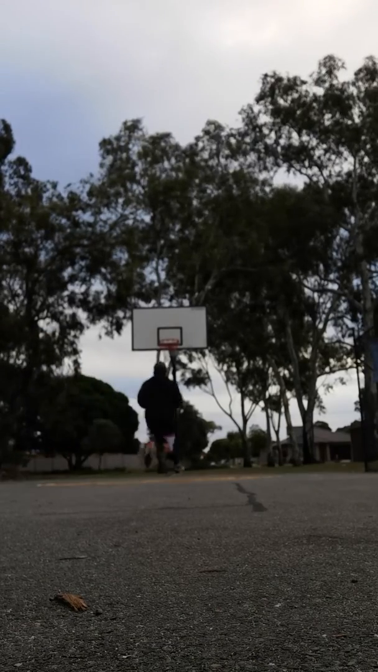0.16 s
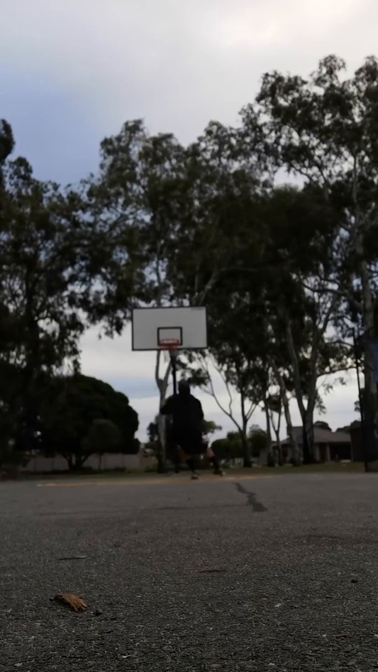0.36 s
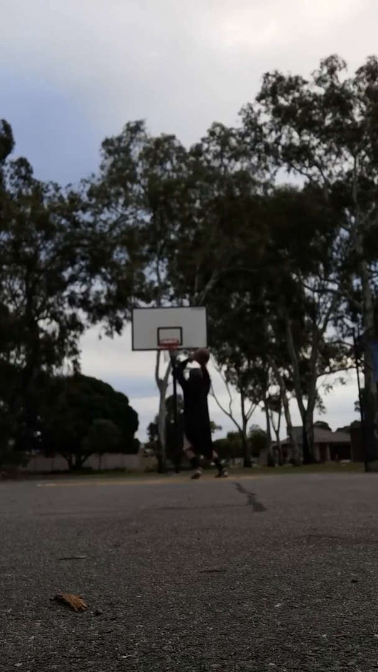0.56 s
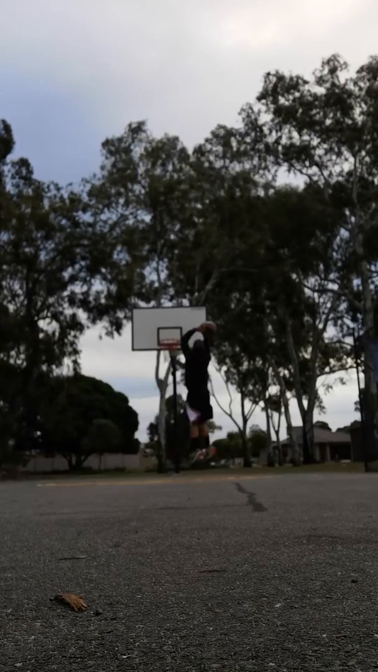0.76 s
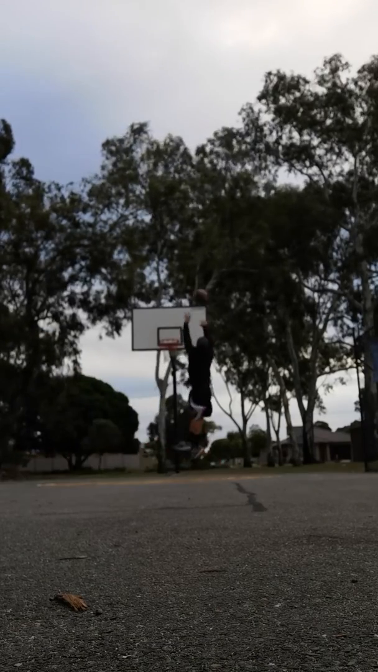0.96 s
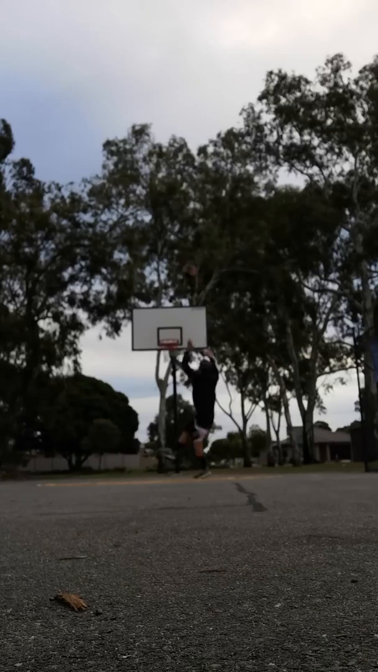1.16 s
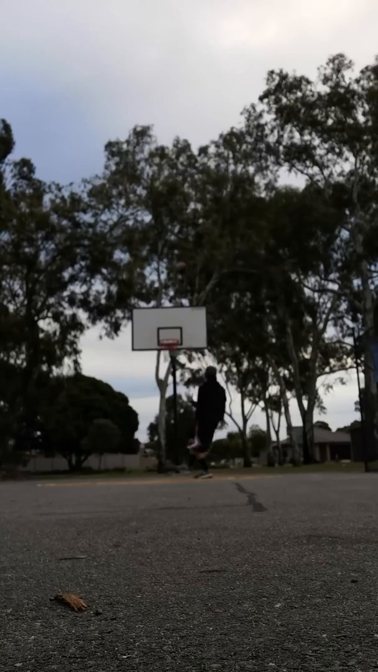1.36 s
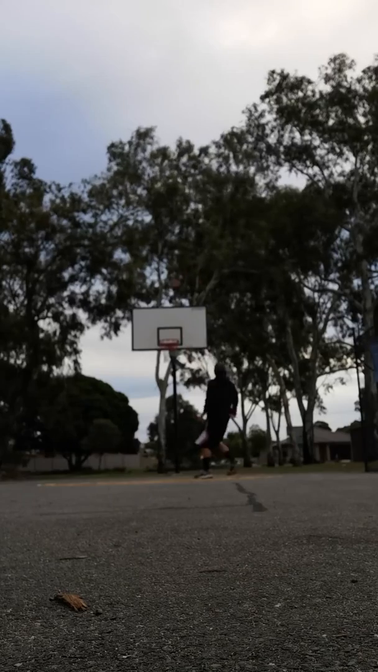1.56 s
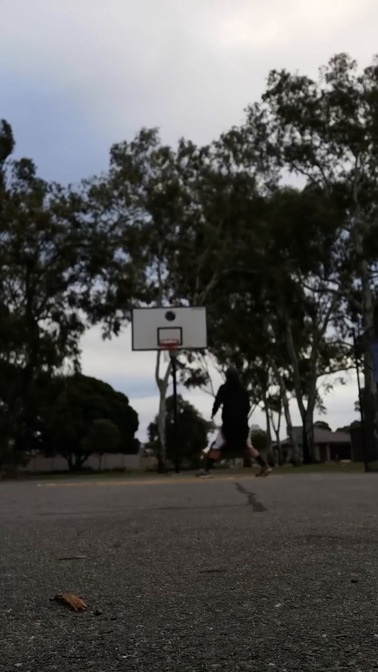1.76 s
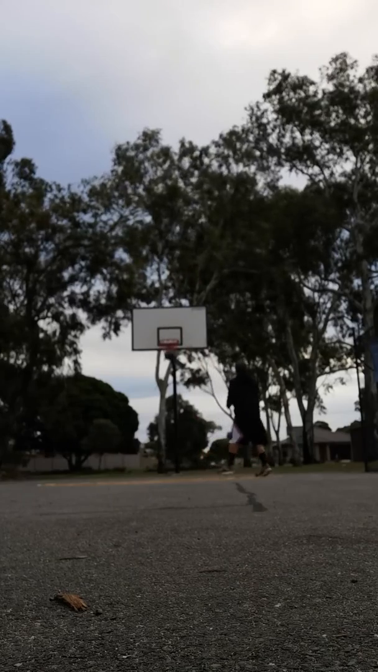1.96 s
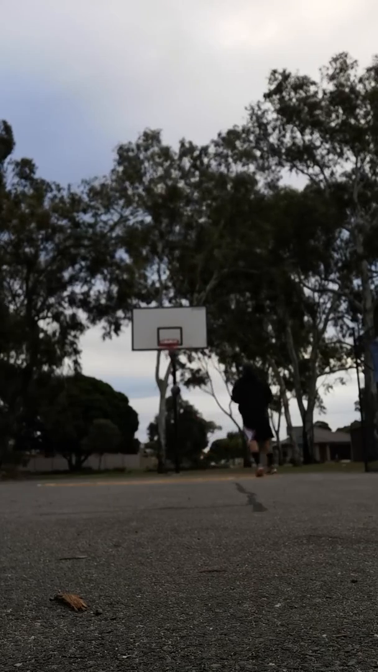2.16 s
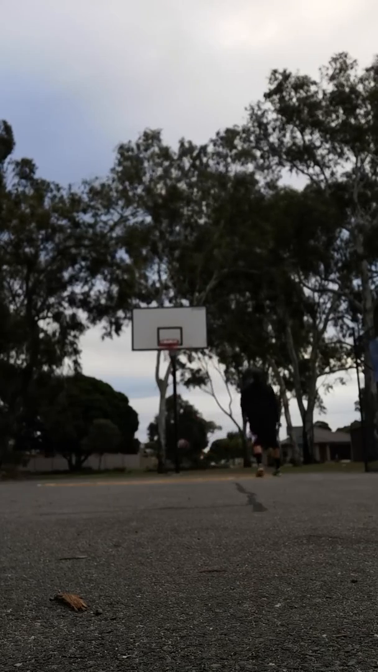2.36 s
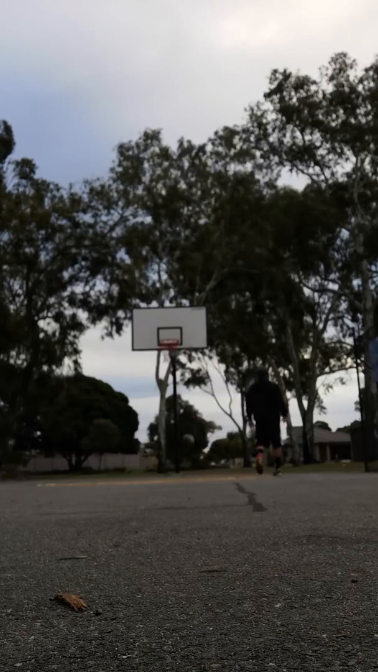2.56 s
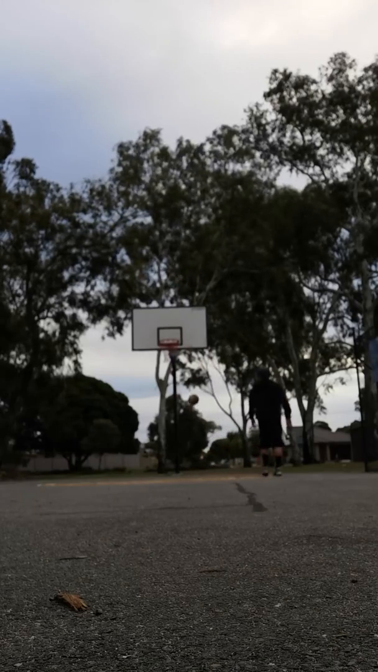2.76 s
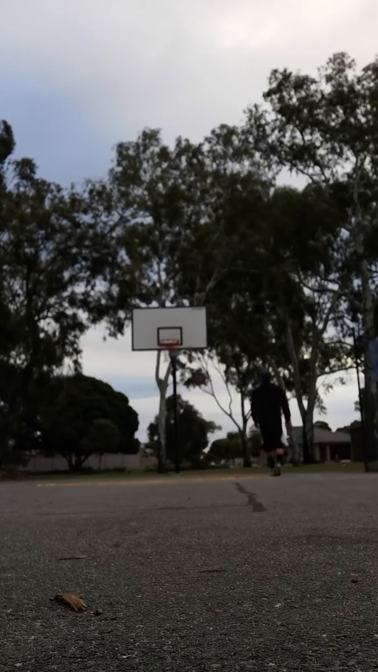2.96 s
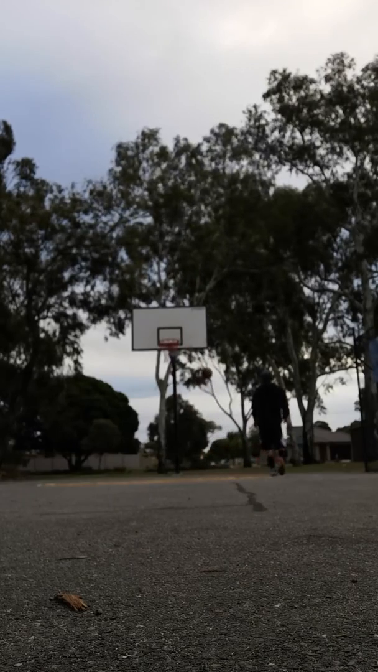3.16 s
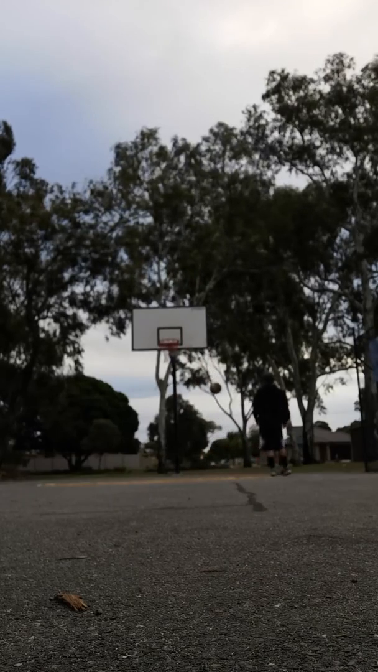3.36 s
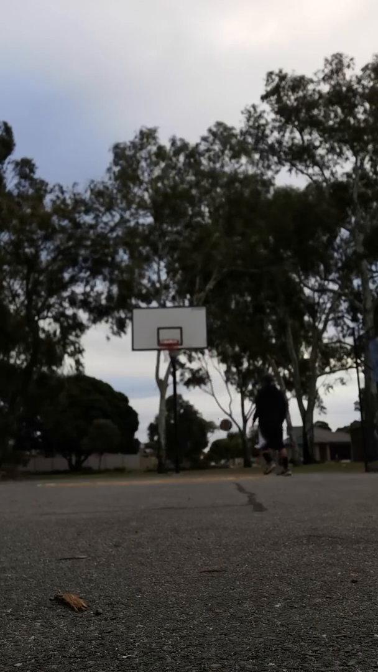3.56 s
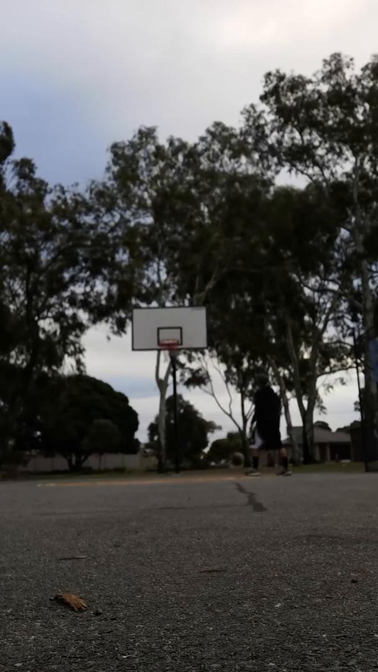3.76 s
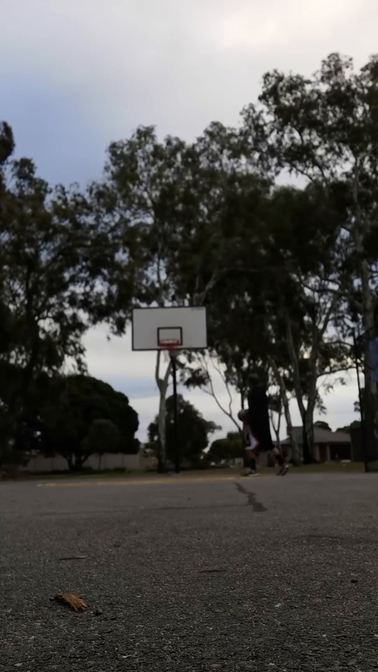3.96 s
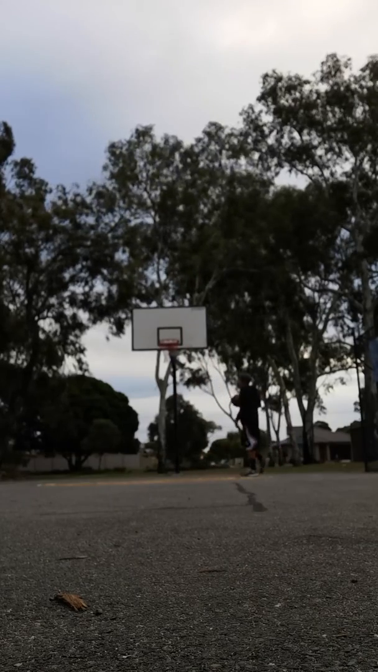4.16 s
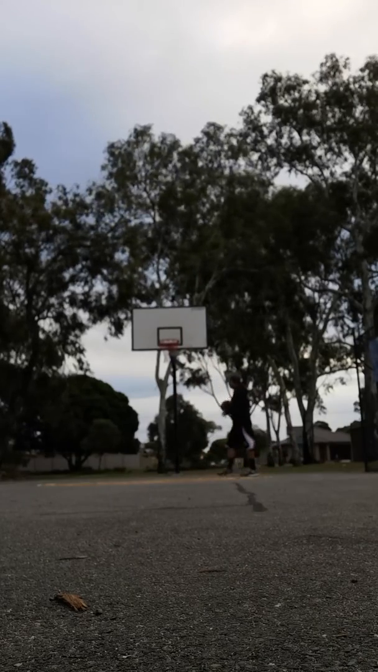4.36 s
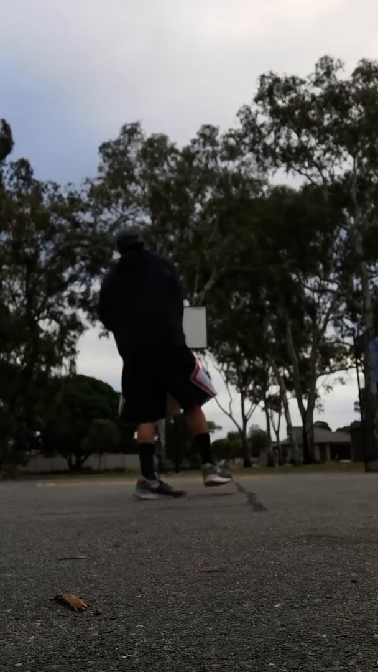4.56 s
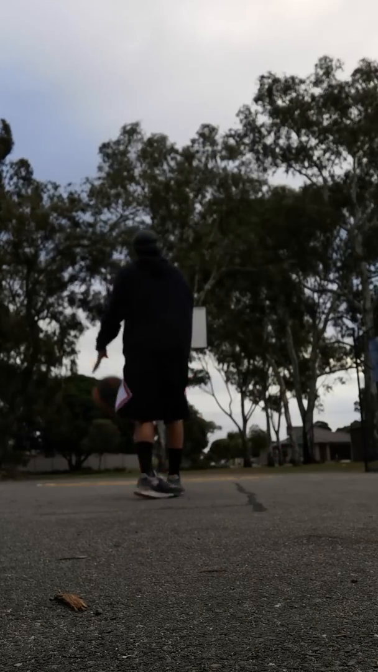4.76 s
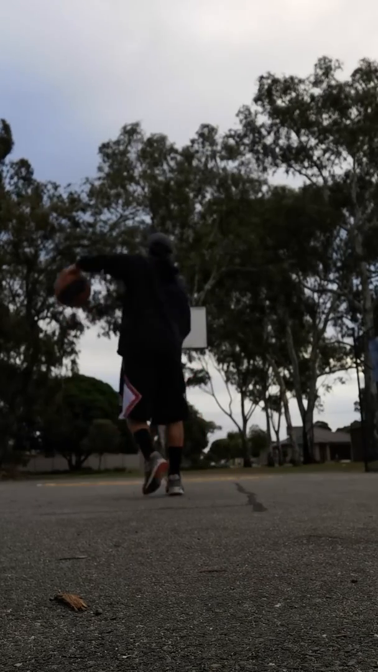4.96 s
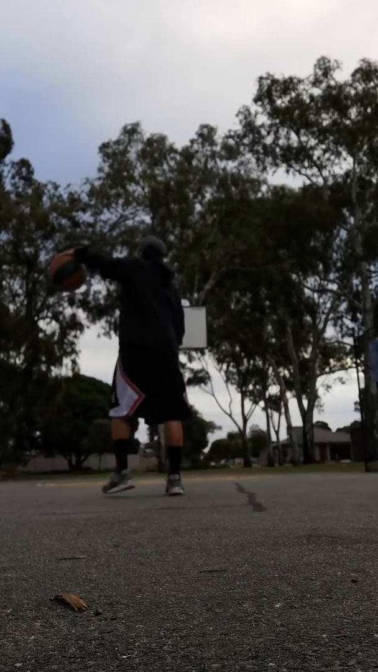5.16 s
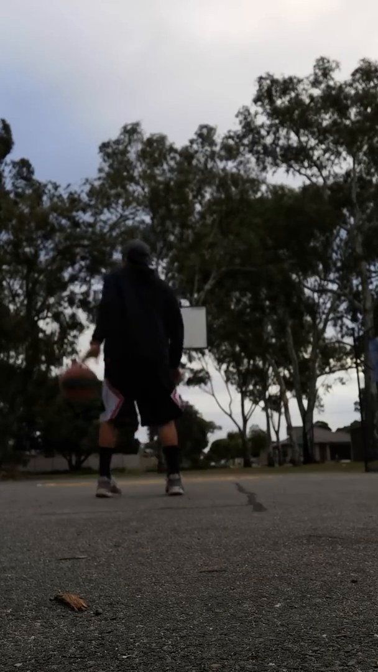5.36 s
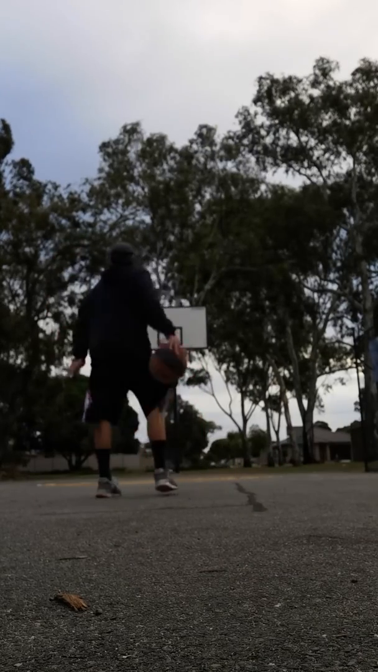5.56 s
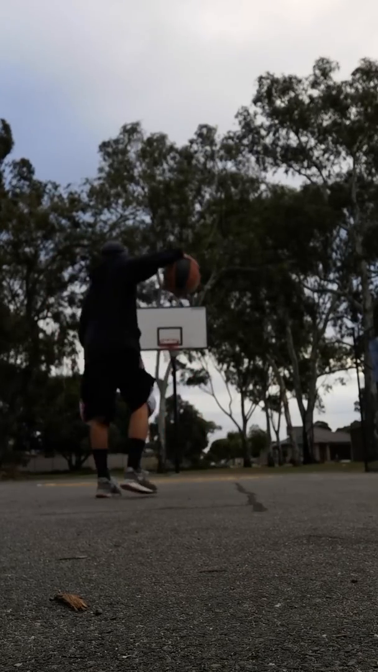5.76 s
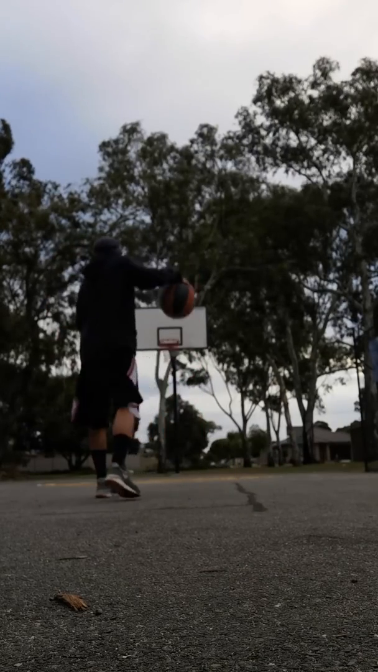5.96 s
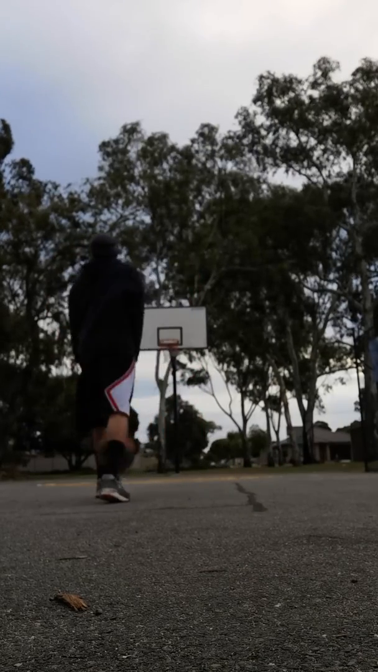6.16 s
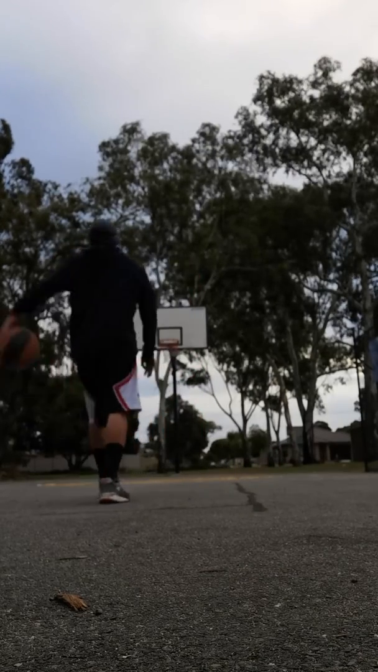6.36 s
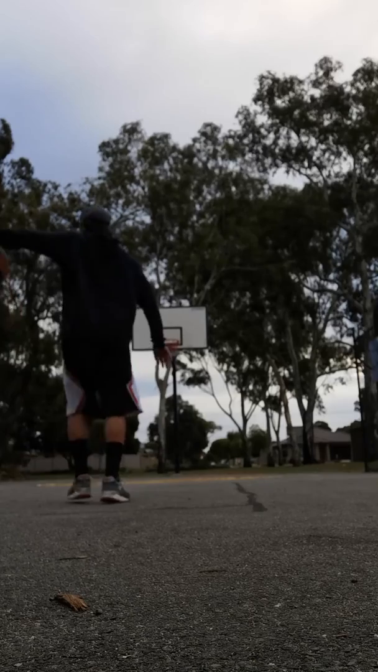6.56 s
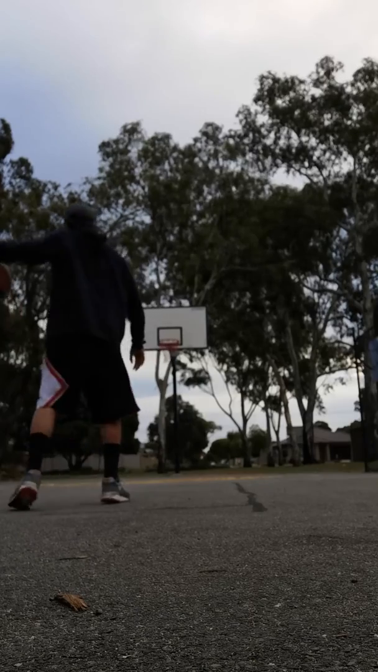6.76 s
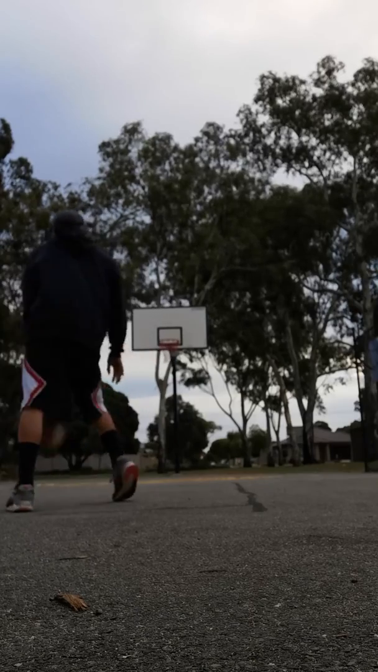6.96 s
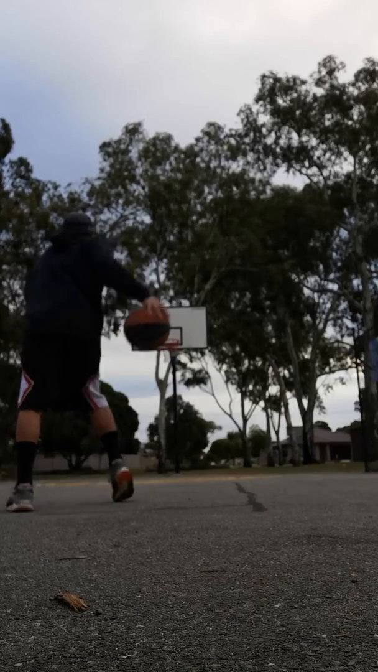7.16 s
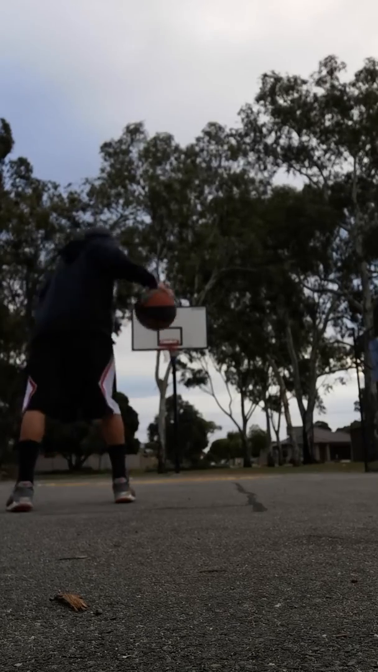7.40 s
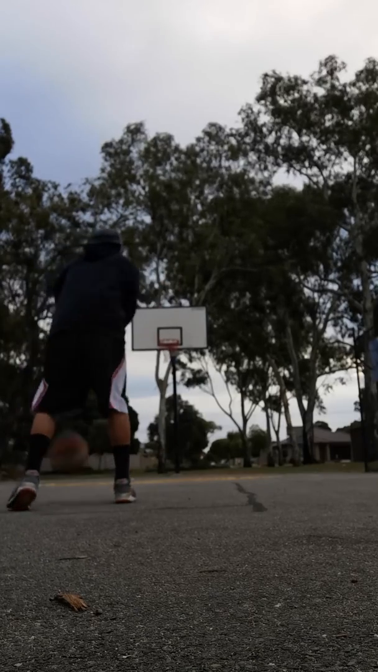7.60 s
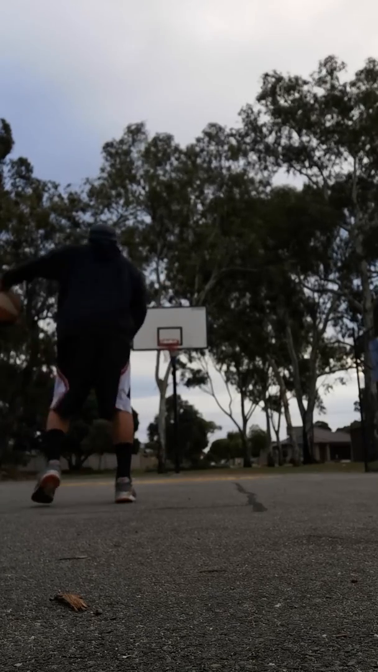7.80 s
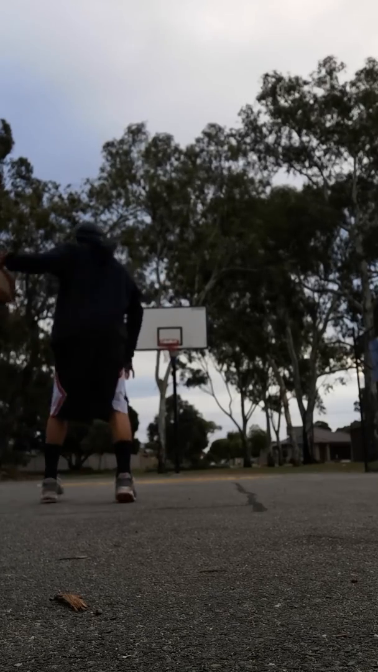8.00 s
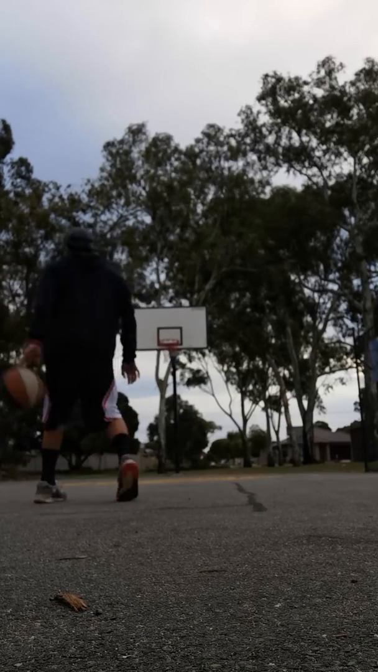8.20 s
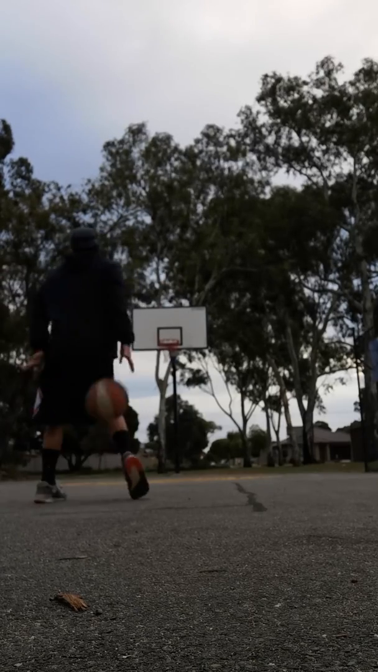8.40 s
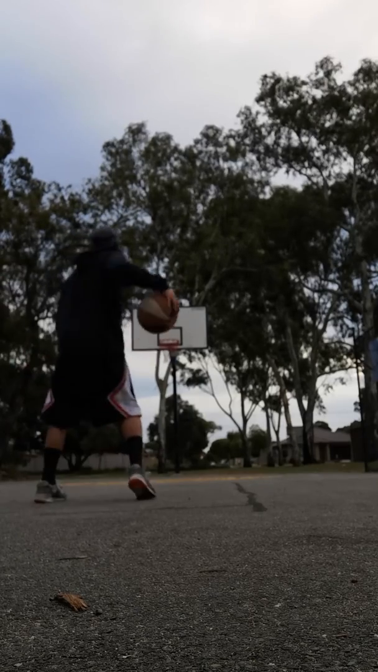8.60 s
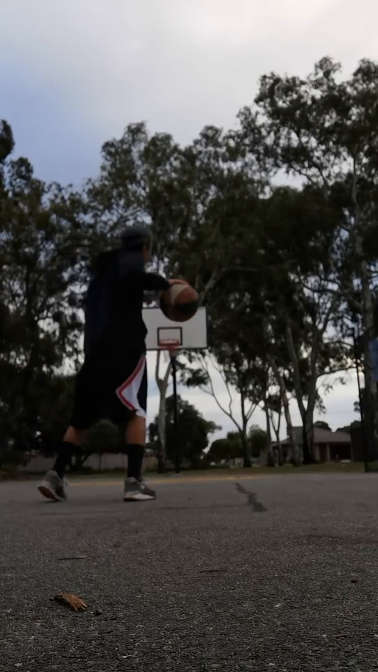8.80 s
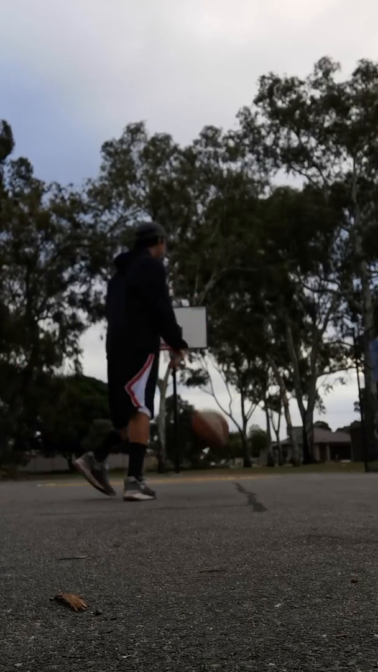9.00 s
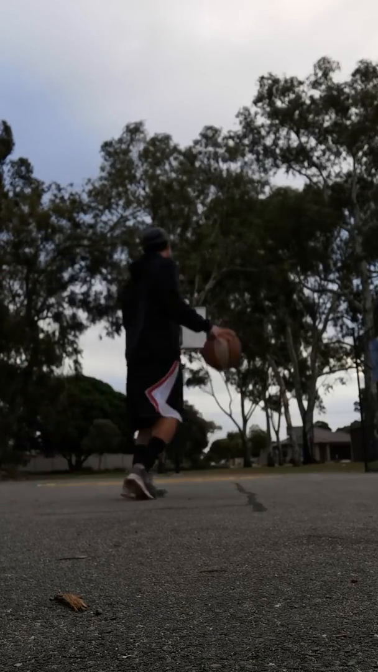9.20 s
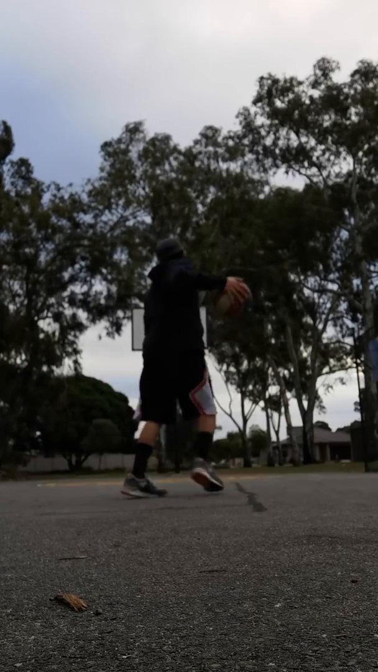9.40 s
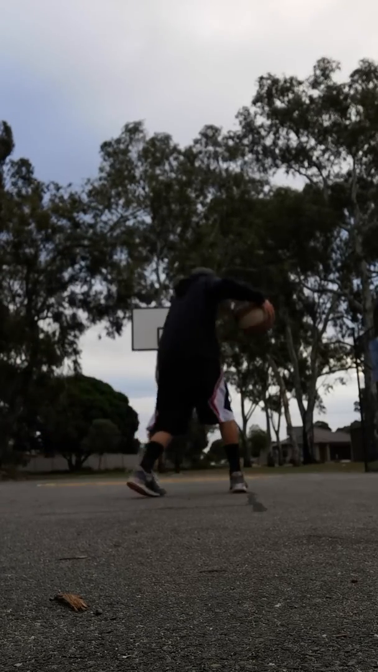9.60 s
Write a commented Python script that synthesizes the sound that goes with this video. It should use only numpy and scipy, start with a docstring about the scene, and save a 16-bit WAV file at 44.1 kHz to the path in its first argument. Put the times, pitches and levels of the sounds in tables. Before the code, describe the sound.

An outdoor asphalt court is heard from ground level. Parrots whistle, trill and screech faintly throughout, over the soft hiss of a distant flock and a low rumble of far traffic. In the first second and a half there are a few dull footfalls and light scuffs. At about 2.1 seconds a basketball hits the backboard with a dull, rattling boom. It lands with a loud slap at 2.6 seconds and bounces again, more softly, at 3.9. From 4.8 seconds an unhurried dribble begins, seven close bounces about three quarters of a second apart, the last at 9.2. Each is a sharp slap with a deep thump, a slight hollow ring and a short echo off the surroundings. Between bounces, palms and soles thud softly, and shoes scrape and crack grit, most clearly from about 6 seconds to the end near 9.6.

```python
"""Outdoor asphalt court, heard by a phone on the ground. One shot booms off the backboard, then a dribble:
each bounce squeezes the basketball's shell, slaps the asphalt, rings the air inside and echoes off
fences and houses. Soles, palms and the ball on the rim or net thud; shoes scuff and crack grit. Parrots
whistle, trill and screech in the trees over the hiss of a far flock and the rumble of far traffic."""
import sys
import numpy as np
from scipy import signal
from scipy.fft import rfft, irfft, next_fast_len
from scipy.io import wavfile
from scipy.ndimage import uniform_filter1d, map_coordinates

SR = 44100
rng = np.random.default_rng(int(sys.argv[2]) if len(sys.argv) > 2 else 0)


def dump(signal):
    """Clip the signal to [-1, 1] and save it as 16-bit WAV at the path in sys.argv[1]."""
    limited = np.clip(np.atleast_2d(signal).T, -1, 1)
    pcm = np.round(limited * 32767).astype(np.int16)
    wavfile.write(sys.argv[1], SR, pcm)


N = 425124
T = np.arange(N) / SR


def amp(db):
    return 10 ** (np.asarray(db) / 20)


def unit_rms(x):
    return x / np.sqrt(np.mean(x ** 2) + 1e-20)


def along(points, hz):
    """Interpolate (f/Hz, value) points on a log axis."""
    f, v = np.transpose(points)
    return np.interp(np.log(hz + 1), np.log(f + 1), v)


def wobble(rate_hz, size=N):
    """Smooth random curve, rate_hz knots a second."""
    knots = rng.standard_normal(int(size * rate_hz / SR) + 4)
    return map_coordinates(knots, [np.arange(size) * rate_hz / SR])


def filtered(x, response):
    """Apply a complex frequency response."""
    m = next_fast_len(x.shape[-1] + 8192)
    return irfft(rfft(x, m) * response(np.fft.rfftfreq(m, 1 / SR)), m)[..., :x.shape[-1]]


def bandpass(f, hz, width_hz):
    return 1j * f * width_hz / (hz * hz - f * f + 1j * f * width_hz)


def add(track, start_s, sound):
    part = track[..., round(start_s * SR):][..., :sound.shape[-1]]
    part += sound[..., :part.shape[-1]]


def contour(rows, fade_s):
    """Rows (t/s, ...) to start time, per-sample columns and edge fade."""
    times, *columns = np.transpose(rows)
    t = np.arange(times[0], times[-1], 1 / SR)
    fade = np.clip(np.minimum(t - times[0], times[-1] - t) / fade_s, 0, 1)
    return times[0], [np.interp(t, times, c) for c in columns], fade


def burst(body, t60_s, lowpass_hz=7000):
    """Decaying cracks through broad resonances; peak 1."""
    def response(f):
        bands = ((-1) ** k * amp(db) * bandpass(f, hz, width) for k, (hz, width, db) in enumerate(body))
        return sum(bands) / (1 + 1j * f / lowpass_hz) ** 2
    t = np.arange(SR // 10) / SR
    cracks = -rng.standard_normal(len(t)) ** 2 * amp(-60 * t / t60_s)
    sound = filtered(cracks, response)
    return sound / np.abs(sound).max()


def ringing(modes, length_s, wander_rad, rise_s):
    """Damped modes with random strengths and wandering phases."""
    t = np.arange(round(length_s * SR)) / SR
    tones = np.zeros(len(t))
    for (hz, db, t60_s), strike_db in zip(modes, rng.normal(0, 2.5, len(modes))):
        phase = 2 * np.pi * hz * t + wander_rad * wobble(39.9, len(t))
        tones += amp(db + strike_db - 60 * t / t60_s) * np.sin(phase)
    return (1 - np.exp(-t / rise_s)) * tones


def glide(call, swell, arch=0):
    """Call to rows (t/s, f/Hz, level/dB). Swell: peak position/length, rise/dB, fall/dB."""
    s, length_s, first_hz, last_hz, db = call
    share, rise_db, fall_db = swell
    peak_hz = (1 + arch) * (first_hz + share * (last_hz - first_hz))
    return [(s, first_hz, db - rise_db), (s + share * length_s, peak_hz, db),
            (s + length_s, last_hz, db - fall_db)]


def sing(track, rows, partials, shake, pulse_hz=0):
    """Mix in one call: partials (multiple, level/dB) on a shaking pitch, optionally pulsed."""
    s, (hz, db), fade = contour(rows, fade_s=.0022)
    n = len(hz)
    jitter = wobble(700, n) + 1.1 * wobble(30, n)
    phase = 2 * np.pi * np.cumsum(hz * (1 + shake * jitter)) / SR
    tone = sum(amp(partial_db) * np.sin(k * phase) for k, partial_db in partials)
    pulses = np.cos(np.pi * pulse_hz * np.arange(n) / SR) ** 2
    add(track, s, amp(db + 2.57 * wobble(68.9, n)) * fade * pulses * tone)


# Diffuse decay: f/Hz, t60/s
COURT_DECAY = [(100, 0.6), (500, 0.82), (2000, 0.92), (8000, 0.23)]


def scatter(x):
    """Diffuse stereo return from the surroundings, decay set per frequency."""
    hz, t, noise = signal.stft(rng.standard_normal((2, SR // 2)), SR, nperseg=256)
    noise = noise[0] + .038 * noise * [[[1]], [[-1]]]
    rise = np.clip(t / .017, 0, 1)
    decay = amp(-60 * t / along(COURT_DECAY, hz)[:, None])
    tail = signal.istft(noise * rise * decay, SR, nperseg=256)[1]
    return signal.fftconvolve(x[None], tail / np.linalg.norm(tail[0]), axes=1)


# Background stereo image: f/Hz, left-right coherence
COHERENCE = [(300, 1), (700, 1), (1500, 0.16), (4000, 0.033), (12000, 0.11)]


def patchy_noise(spectrum, patch_db=3):
    """Stereo noise with random gain patches in time and frequency; rms 1."""
    def response(f):
        angle = np.arccos(np.clip(along(COHERENCE, f), -1, 1)) / 2
        return amp(along(spectrum, f)) * [np.cos(angle), np.sin(angle)]
    bins = signal.stft(rng.standard_normal((2, N)), nperseg=512)[2]
    patches = uniform_filter1d(uniform_filter1d(rng.standard_normal(bins.shape[1:]), 5, 0), 12, 1)
    pair = signal.istft(bins * amp(patch_db * unit_rms(patches)), nperseg=512)[1][:, :N]
    mid, side = filtered(pair, response)
    return unit_rms(np.array([mid + side, mid - side]))


# Background envelopes: t/s, flock level/dB, traffic level/dB
BACKGROUND_LEVELS = [(0, -55, -49.5), (.7, -60, -48), (2.1, -62, -47.5), (2.95, -55.5, -47),
                     (3.35, -57, -48.5), (3.7, -61.5, -48.5), (4.0, -62, -44.5), (4.35, -55.5, -49.5),
                     (4.72, -62, -47.5), (5.25, -65, -48), (5.83, -59.5, -49.5), (6.1, -64, -47),
                     (7.0, -58.5, -47.5), (8.0, -55.5, -46.5), (8.998, -57.5, -48.5), (9.64, -62, -47.5)]
# Noise spectra: f/Hz, relative density/dB
FLOCK_SPECTRUM = [(760, -19), (1300, -10), (1880, -14), (2040, -8), (2290, -8), (2950, -8), (4000, -14.5),
                  (4930, -12), (5370, -14), (6150, -18), (6900, -19.5), (8100, -31.5), (10200, -26.5),
                  (14400, -41.5), (16000, -64)]
TRAFFIC_SPECTRUM = [(20, -18), (42, -6.5), (81, -2.5), (264, -16.5), (439, -23.5), (539, -25.5),
                    (1330, -32.5), (1800, -35), (2340, -80), (3960, -120)]


def background():
    """A far flock blurs into hiss over traffic rumble."""
    times, flock_db, traffic_db = np.transpose(BACKGROUND_LEVELS)
    flock = amp(np.interp(T, times, flock_db) + 1.7 * wobble(7)) * patchy_noise(FLOCK_SPECTRUM)
    traffic = amp(np.interp(T, times, traffic_db) + 1.72 * wobble(7.7)) * patchy_noise(TRAFFIC_SPECTRUM)
    return flock + traffic


# Parrot screeches: t/s, length/s, first f/Hz, last f/Hz, level/dB
SCREECH_CALLS = [(0.0, 0.3, 3820, 3710, -58.5), (0.72, 0.27, 3900, 3790, -52.5),
                 (1.225, 0.21, 3550, 3500, -49), (1.47, 0.24, 3450, 3900, -50.5),
                 (1.85, 0.26, 4920, 5410, -60.5), (2.28, 0.14, 3820, 4390, -50.5),
                 (2.95, 0.31, 4380, 5330, -51), (4.86, 0.11, 4800, 5270, -54),
                 (6.632, .21, 3504, 3760, -49), (8.62, 0.43, 4320, 4330, -58),
                 (9.08, 0.11, 4610, 4770, -50.5), (9.291, 0.14, 4830, 4850, -49.5)]


def screeches():
    """Pulsed calls with fast pitch shake; a second bird rasps along."""
    out = np.zeros(N)
    for call in SCREECH_CALLS:
        rows = glide(call, swell=(.31, 10, 7.8), arch=.084)
        sing(out, rows, [(2 / 3, -6), (1, 0), (4 / 3, -5)], shake=.026, pulse_hz=75)
        sing(out, rows, [(1.25, -4.5)], shake=.051, pulse_hz=15)
    return out


# Parrot whistles: t/s, length/s, first f/Hz, last f/Hz, level/dB
WHISTLE_CALLS = [(0.061, 0.089, 3750, 3820, -48.5), (0.81, 0.16, 3640, 3790, -51.5),
                 (1.001, 0.087, 3550, 4160, -57), (1.35, 0.24, 1280, 1004, -62),
                 (2.439, 0.16, 4310, 4730, -50.5), (2.799, 0.036, 2740, 2920, -44),
                 (3.371, 0.068, 1260, 1138, -54.5), (3.556, 0.039, 5900, 5620, -50.5),
                 (4.2, 0.042, 3440, 3540, -50), (4.309, 0.11, 4450, 4680, -51.5),
                 (4.561, 0.025, 3410, 3350, -42.5), (4.561, 0.076, 3760, 3630, -49),
                 (4.57, 0.04, 4600, 4910, -52), (4.59, 0.064, 2450, 1940, -58),
                 (4.849, 0.1, 2550, 3006, -52), (5.68, 0.018, 4460, 4860, -49.5),
                 (5.751, 0.032, 3050, 2950, -42), (6.01, 0.088, 5630, 5270, -56.5),
                 (6.4, 0.17, 2790, 2796, -52.5), (6.45, 0.078, 4820, 5320, -58.5),
                 (7.42, 0.0287, 3420, 4330, -55), (7.45, 0.019, 4210, 3880, -48.5),
                 (7.5, 0.22, 3540, 3550, -52.5), (7.779, 0.09, 2582, 2730, -44.5),
                 (7.803, 0.2, 5270, 5260, -59), (7.9, 0.095, 3480, 3420, -59),
                 (7.919, 0.082, 1800, 1770, -49), (8.622, 0.12, 2804, 2986, -54.5),
                 (8.699, 0.059, 3020, 2810, -56), (8.721, 0.038, 5730, 5850, -49.5),
                 (8.9, 0.14, 1964, 1896, -55.5), (9.41, 0.028, 5600, 5400, -54.5),
                 (0.02, 0.072, 2520, 2830, -53), (.293, 0.043, 4530, 4840, -48),
                 (0.11, 0.12, 3330, 3700, -54.5), (3.01, 0.036, 5300, 5300, -53),
                 (3.11, 0.055, 5850, 5740, -49.5), (3.35, 0.06, 3350, 3520, -49),
                 (4.025, 0.015, 3450, 3460, -46.5), (4.181, 0.024, 2510, 2800, -56),
                 (4.21, 0.037, 4520, 4740, -53), (4.285, 0.013, 3150, 3720, -46.5),
                 (7.66, 0.036, 1896, 2710, -52)]


def whistles():
    """Nearly pure glides with a faint octave."""
    out = np.zeros(N)
    for call in WHISTLE_CALLS:
        sing(out, glide(call, swell=(.42, 2.9, 3.1)), [(1, 1), (2, -21)], shake=.018)
    return out


# Resonances of a dull thud, and of rubber on asphalt: f/Hz, width/Hz, level/dB
THUD_BANDS = [(230, 180, -1.5), (600, 314, -4.5), (1170, 410, -14.5)]
SLAP_BANDS = [(1450, 950, 10.5), (1714, 590, 20.5), (3370, 990, 1), (6570, 340, -18), (10200, 1700, -23)]
# Dull thuds: t/s, level/dB, tick re thud/dB
THUD_HITS = [(0.022, -28.5, -25), (0.404, -24, -12), (0.546, -26, -22), (1.286, -30, -23),
             (1.335, -34, 1.5), (2.29, -31, -28), (2.776, -24, -16), (3.452, -45, 11), (4.566, -62, 16),
             (5.46, -31.5, -19), (5.54, -31, -17), (6.182, -37.5, -4), (6.236, -31, -5), (6.476, -27, -6.5),
             (7.093, -26, -37), (7.239, -25, -14), (7.377, -44.5, 13.5), (7.768, -27.5, -37),
             (8.17, -33.5, -13), (9.258, -19, -16)]


def thuds():
    """Dull thuds, each with a tick: soles, palms, and the ball on the rim or net."""
    out = np.zeros((2, N))
    for s, db, tick_db in THUD_HITS:
        add(out, s, amp(db) * (burst(THUD_BANDS, .094) + amp(tick_db) * burst(SLAP_BANDS, .0047)))
    return out


def twitter(count=50):
    """Farther birds: short gliding chirps at random times."""
    out = np.zeros(N)
    for when, pitch, bend, length, strength in rng.random((count, 5)):
        s, length_s = when * N / SR, .0085 + .043 * length
        hz, db = 2200 + 3800 * pitch, -75 + 9 * strength
        rows = [(s, hz, db), (s + length_s, hz * (.8 + .35 * bend), db - 2)]
        sing(out, rows, [(1, 0), (2, -18)], shake=.025)
    return out


# Parrot trill: t/s, period/s, low f/Hz, high f/Hz, low level/dB, high level/dB
TRILL_CALL = (.364, .061, 1560, 2040, -55, -56)


def trill():
    """Four flips between two notes; the low one sounds only its overtones."""
    out = np.zeros(N)
    start_s, period_s, low_hz, high_hz, low_db, high_db = TRILL_CALL
    for s in start_s + period_s * np.arange(4):
        low = [(s, .97 * low_hz, low_db), (s + period_s / 2, 1.02 * low_hz, low_db)]
        high = [(s + period_s / 2, high_hz, high_db), (s + period_s, high_hz, high_db)]
        sing(out, low, [(2, -1), (3, 1), (4, -7)], shake=.008)
        sing(out, high, [(1, 4), (3, -5)], shake=.008)
    return out


# Grit spectra: f/Hz, relative density/dB
HISS_SPECTRUM = [(2350, 7), (4000, -2), (5100, 20), (6820, 26), (7700, 10.5), (11000, 16), (15500, -18),
                 (16000, -53)]
SCRAPE_SPECTRUM = [(150, -53), (250, -12), (479, -5.5), (666, -10), (758, -6), (1710, -10.5), (2410, -9),
                   (4200, -11), (5460, -44)]
# Sole drags: t/s, rise/s, fall/s, hiss level/dB, scrape re hiss/dB
SCUFF_STROKES = [(0.44, 0.16, 0.048, -61, 14), (1.27, 0.01, 0.14, -75.5, 27),
                 (2.27, 0.025, 0.15, -65, 15.5), (2.95, 0.148, 0.042, -59, 7),
                 (3.436, 0.018, 0.069, -58.5, 16), (4.88, 0.063, 0.051, -53, 7),
                 (6.178, 0.011, 0.039, -51.5, 4.5), (6.229, 0.0086, 0.017, -56.5, 7.5),
                 (6.63, 0.088, 0.28, -62.5, 1.5), (6.844, 0.0044, 0.022, -38, 3),
                 (6.868, 0.006, 0.053, -38.5, 4), (6.95, 0.054, 0.1, -59, 9), (7.389, 0.025, 0.076, -54, 2),
                 (8.22, 0.17, 0.048, -56.5, 5), (9.25, 0.012, 0.17, -58.5, 17.5),
                 (9.608, 0.029, 0.0073, -41.5, 7.5)]


def scuffs(rise_db=14.5, fall_db=12.5):
    """Dragged soles crush grit in dense grains: high hiss over a lower scrape."""
    out = np.zeros((2, N))
    noise = rng.standard_normal(N) + .5 * rng.standard_normal((2, N))
    grains = noise * amp(4.2 * wobble(600) + 3.26 * wobble(70))
    hiss = unit_rms(filtered(grains, lambda f: amp(along(HISS_SPECTRUM, f))))
    scrape = unit_rms(filtered(grains, lambda f: amp(along(SCRAPE_SPECTRUM, f))))
    for s, rise_s, fall_s, peak_db, scrape_db in SCUFF_STROKES:
        rows = [(s, peak_db - rise_db), (s + rise_s, peak_db), (s + rise_s + fall_s, peak_db - fall_db)]
        s, (db,), fade = contour(rows, fade_s=.003)
        span = np.minimum(round(s * SR) + np.arange(len(db)), N - 1)
        add(out, s, amp(db) * fade * (hiss[:, span] + amp(scrape_db) * scrape[:, span]))
    return out


HOARSE_SWELL = (.65, 4.3, 6.7)  # peak position/length, rise/dB, fall/dB
# Overtone-rich calls, at partial 2: t/s, length/s, first f/Hz, last f/Hz, level/dB
STACKED_CALLS = [(1.749, 0.056, 2410, 2765, -54.5), (1.806, 0.028, 2750, 2480, -54),
                 (2.76, 0.044, 2485, 2645, -46), (3.808, 0.094, 2484, 2725, -57),
                 (8.251, 0.12, 2610, 2824, -50.5)]


def stacked_notes():
    """Parrot notes of four harmonics, the second strongest."""
    out = np.zeros(N)
    for call in STACKED_CALLS:
        sing(out, glide(call, HOARSE_SWELL), [(.5, -5), (1, 0), (1.5, -4), (2, -11)], shake=.015)
    return out


# Flexing ball shell: f/Hz, width/Hz, level/dB
SHELL_BANDS = [(250.4, 76, 1), (473, 129, -0.5), (653, 434, -2.5), (1014, 740, -2.5), (1245, 282, -2.5)]
# Board and pole modes: f/Hz, level/dB, t60/s
BOARD_MODES = [(103.7, -1, 1.32), (149.4, 5, 0.5), (261, -1, 0.53), (451, -11, 0.28), (532, -9, 0.11),
               (756, -8, 0.062), (910, -32, 0.74), (1130, -24, 0.27)]


def backboard(start_s=2.0705, db=-24):
    """The ball knocks on the board, which booms and rattles on its pole."""
    out, t = np.zeros((2, N)), np.arange(SR) / SR
    noise = filtered(rng.standard_normal(SR), lambda f: bandpass(f, 400, 700) / (1 + 1j * f / 1100) ** 2)
    modes = ringing(BOARD_MODES, 1, wander_rad=.91, rise_s=.0009)
    rattle = amp(-3.5 - 60 * t / .25 + 5.1 * wobble(32, SR)) * unit_rms(noise)
    boom = filtered(amp(db) * (modes + rattle), lambda f: 1 / (1 + 1j * f / 1300) ** 3)  # far, so dull
    add(out, start_s, boom)
    add(out, start_s, amp(db + 2) * burst(SHELL_BANDS, .04))
    add(out, start_s, amp(-16.5) * scatter(boom))
    return out


# Air modes inside the ball: f/Hz, level/dB, t60/s
CAVITY_MODES = [(470, 6, .14), (965, 1, .45), (1200, -10, .2), (2120, -2, .35), (2790, -8, .4),
                (3185, -3, .22), (3700, -9, .3)]
# Early echoes of the slap off nearby surfaces: delay/s, level re slap/dB
SLAP_ECHOES = [(.0095, -20), (.0175, -27)]
# Fence and house echoes: delay/s, level/dB
WALL_ECHOES = [(0.058, -29), (.085, -31.5), (.15, -32), (.225, -33), (.255, -38)]
# Bounces: t/s, slap level/dB, thump level/dB, knock level/dB, thump f/Hz, grit level/dB
BOUNCE_HITS = [(2.6113, -11, -5.5, -10, 152.4, -56), (3.8853, -23.5, -10, -13.5, 134, -53),
               (4.791, -17.5, -0.5, -5.5, 149, -33.5), (5.582, -6.5, 1, -5.5, 132.5, -44),
               (6.3299, -11, 2.5, -6, 132.4, -23), (7.143, -8, 0.5, -5, 126.6, -16),
               (7.7065, -4.5, 0, -8, 145.6, -14), (8.4327, -7.5, -2.5, -4.5, 128, -43),
               (9.1912, -9, 1.5, -5, 136, -15.5)]


def dribble(squeeze_s=.0043, pressed_turns=.19):
    """Each bounce squeezes the shell: thump, ringing air, slap, knock, then echoes."""
    out, t = np.zeros((2, N)), np.arange(SR // 3) / SR
    squeeze = (t / squeeze_s * np.exp(1 - t / squeeze_s)) ** 3
    settle = amp(-10) * np.exp(-t / .009) * np.clip(t / squeeze_s, 0, 1)
    for s, slap_db, thump_db, knock_db, thump_hz, grit_db in BOUNCE_HITS:
        turns = thump_hz * t + pressed_turns * (1 - np.exp(-t / .0015))  # stiffer, so higher at first
        hit = -amp(thump_db) * (squeeze + settle) * np.sin(2 * np.pi * turns)
        hit += amp(thump_db - 44) * ringing(CAVITY_MODES, 1 / 3, wander_rad=.8, rise_s=.015)
        grit = amp(grit_db) * burst(SLAP_BANDS[2:], .006, lowpass_hz=12000)
        slap = amp(slap_db) * burst(SLAP_BANDS[:3], .007, lowpass_hz=3400)
        for delay_s, echo_db in SLAP_ECHOES:
            add(hit, delay_s, amp(slap_db + echo_db) * burst(SLAP_BANDS[:3], .034, lowpass_hz=4000))
        knock = amp(knock_db) * burst(SHELL_BANDS, .05)
        shiver = amp(knock_db - 32.5) * burst(SHELL_BANDS + SLAP_BANDS[2:3], .2)
        add(hit, 0, grit - slap + knock + shiver)
        add(out, s, hit)
        # Echoes lack deep bass and treble.
        echo = filtered(hit, lambda f: 1j * f / (90 + 1j * f) / (1 + 1j * f / 2500))
        add(out, s + .05, amp(-26) * scatter(echo))  # late: the houses stand far off
        for delay_s, wall_db in WALL_ECHOES:
            add(out, s + delay_s + delay_s * rng.normal(0, .02), amp(wall_db + rng.normal(0, .66)) * echo)
    return out


# Warble contour: t/s from onset, f/Hz, relative level/dB
WARBLE_SHAPE = [(0, 2974, -1), (.012, 4380, -0.5), (.032, 4350, -3.5), (.042, 4200, -19), (.063, 3700, 3.5),
                (.078, 4260, -6.5), (.095, 4410, 6)]
# Parrot warbles: t/s, level/dB
WARBLE_CALLS = [(2.871, -44.5), (3.927, -43), (5.923, -49.5)]


def warbles():
    """A whistle leaps up, dips and climbs again."""
    out = np.zeros(N)
    for s, db in WARBLE_CALLS:
        sing(out, np.add(WARBLE_SHAPE, [s, 0, db]), [(1, 2.5), (2, -30.5)], shake=.0177)
    return out


# Hoarse calls: t/s, length/s, first f/Hz, last f/Hz, level/dB, shake/pitch
HOARSE_CALLS = [(3.255, 0.11, 2950, 3280, -50, .012), (4.3, .125, 2520, 3300, -53, .016),
                (4.604, 0.0427, 3060, 3040, -49, .02), (5.696, 0.25, 2820, 2840, -53, 0.052),
                (4.494, 0.04, 2550, 3300, -63, 0.016), (4.19, .1, 2400, 2150, -60, 0.016),
                (4.34, 0.06, 2750, 2100, -56, 0.016)]


def hoarse_notes():
    """Shaky parrot glides with a strong octave."""
    out = np.zeros(N)
    for *call, shake in HOARSE_CALLS:
        sing(out, glide(call, HOARSE_SWELL), [(1, 7), (2, -4), (3, -19)], shake)
    return out


# Grain cracks: t/s, level/dB
CRUNCH_HITS = [(7.647, -42), (7.955, -47.5), (8.012, -55), (8.2551, -54), (8.2694, -55), (8.2931, -50),
               (8.3105, -44), (8.3374, -41), (8.3524, -50), (8.3828, -45)]


def crunches():
    """Single grains crack under a sole."""
    out = np.zeros((2, N))
    for s, db in CRUNCH_HITS:
        add(out, s, amp(db) * burst(SLAP_BANDS[3:], .0065, lowpass_hz=14000))
    return out


# Port phase: f/Hz, right lag/rad
PORT_LAG = [(20, .25), (140, .2), (500, .25), (1000, .5), (1600, 2.8), (2400, 5.5), (3100, 4.7),
            (3800, 6.5), (4900, 4.6), (5700, 6.5), (9000, 5.5), (16000, 6)]
# Port balance, near and far sources: f/Hz, left re right/dB
NEAR_BALANCE = [(100, -.6), (600, -.6), (1000, 2), (2000, -5), (4000, -3.5), (6500, 0), (9000, 17),
                (14000, 15)]
FAR_BALANCE = [(60, 0.5), (180, -0.5), (550, -2), (1650, -1), (4970, -7), (15000, 17.5)]


def ports(x, balance):
    """The phone's two ports differ in phase and, by direction, in colour."""
    def response(f):
        return amp([[.5], [-.5]] * along(balance, f)) * np.exp([[0], [-1j]] * along(PORT_LAG, f))
    return filtered(x, response)


def scene():
    """Ball and player near; board, birds and traffic far."""
    near = dribble() + thuds() + crunches() + scuffs()
    board = backboard()
    parrots = whistles() + hoarse_notes() + stacked_notes() + warbles() + trill() + screeches()
    far = board + parrots + amp(-10.5) * scatter(parrots)[:, :N] + twitter() + background()
    return ports(near, NEAR_BALANCE) + ports(far, FAR_BALANCE)


def record(dry):
    """Gain control ducks loud thumps; peaks round off; the band is limited."""
    smooth_s, knee_db, top_hz = .0013, -27, 15800
    pole = np.exp(-1 / (smooth_s * SR))
    power = signal.lfilter([1 - pole], [1, -pole], np.mean(dry ** 2, axis=0))
    ducked = dry * (1 + power / amp(knee_db)) ** -.15
    rounded = ducked / (1 + np.abs(ducked) ** 8) ** (1 / 8)
    return filtered(rounded, lambda f: (f < top_hz) / (1 + (f / 14000) ** 12))


dry = scene()
out = record(dry)
dump(out)
```